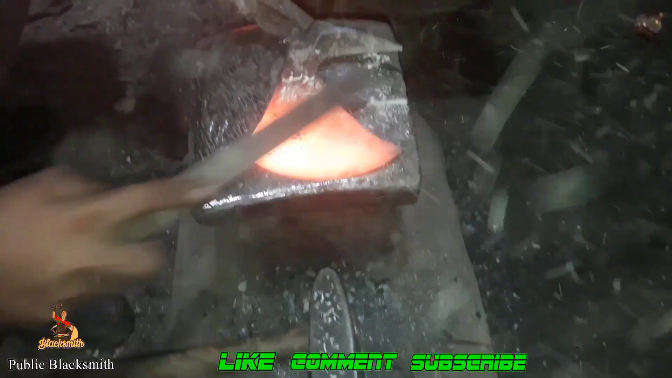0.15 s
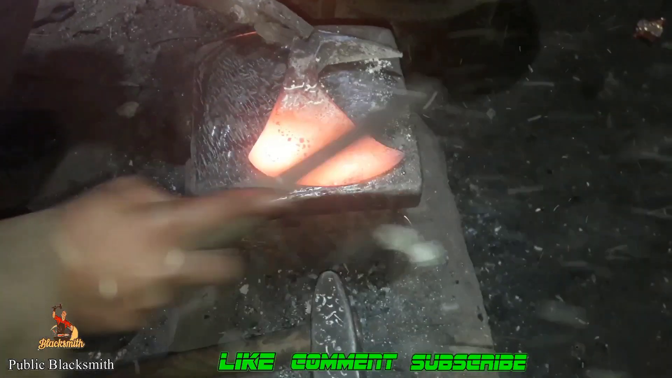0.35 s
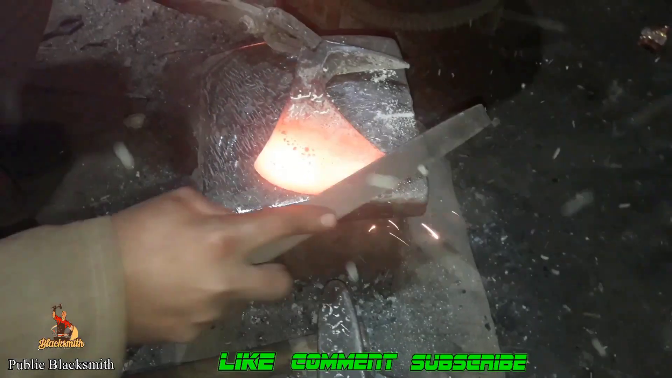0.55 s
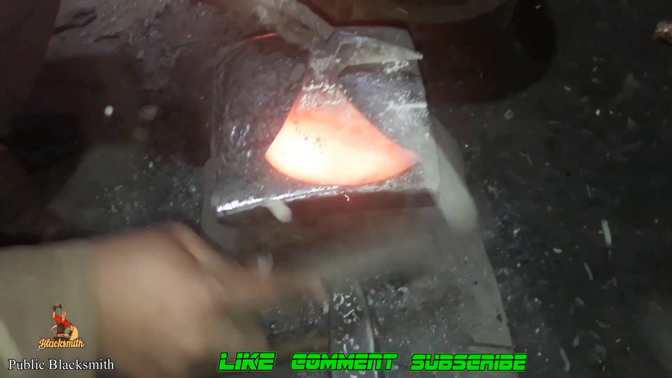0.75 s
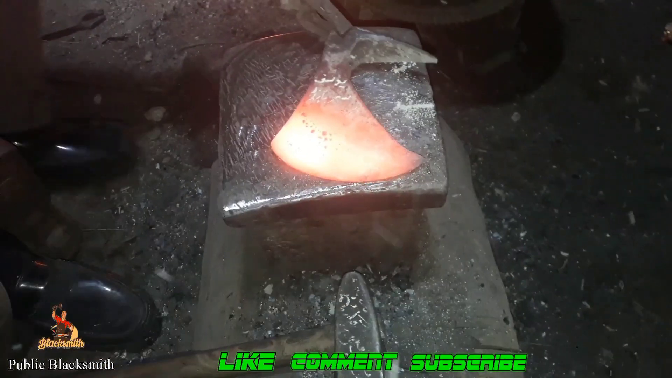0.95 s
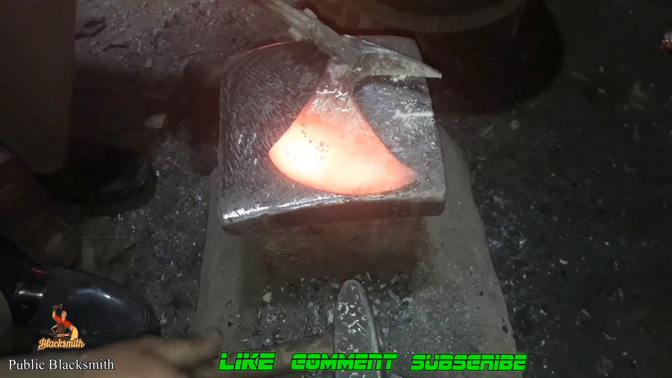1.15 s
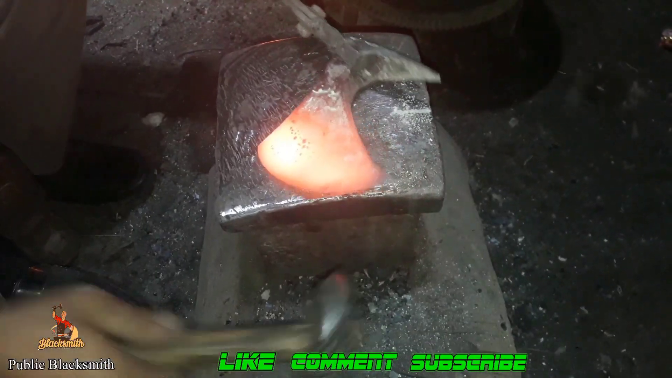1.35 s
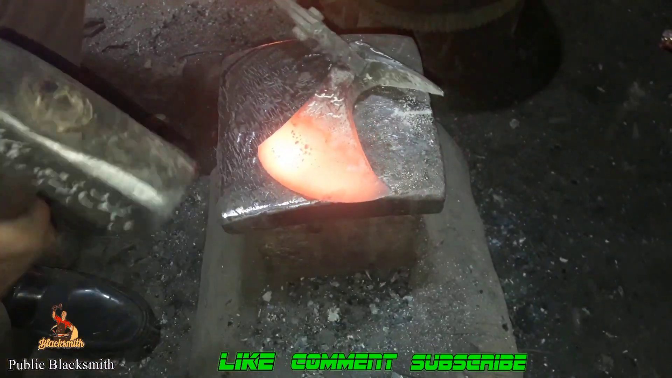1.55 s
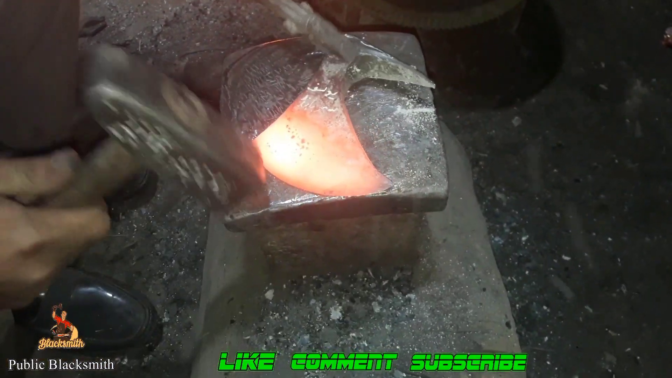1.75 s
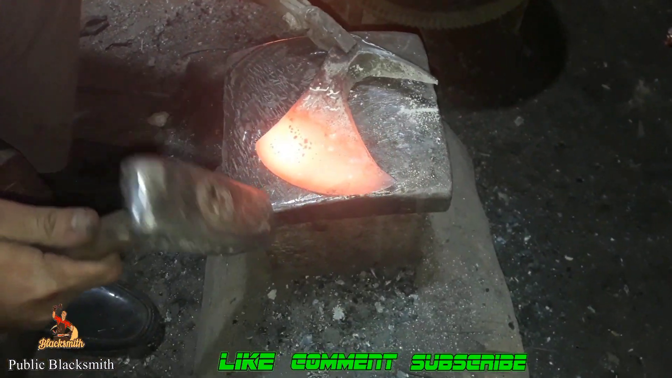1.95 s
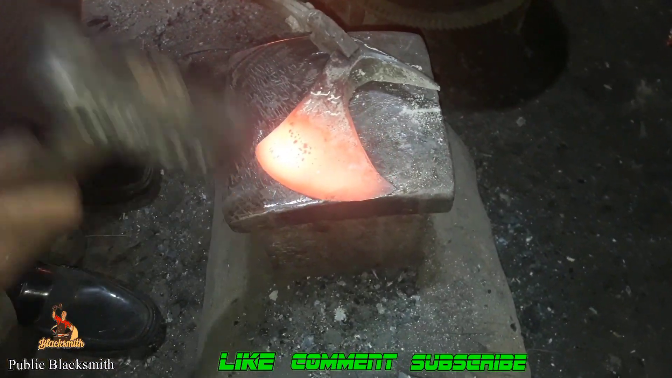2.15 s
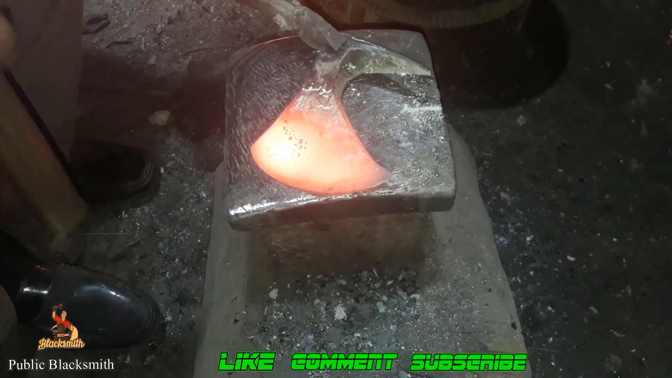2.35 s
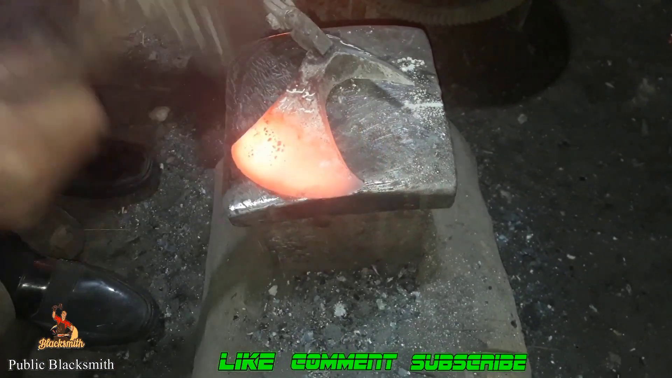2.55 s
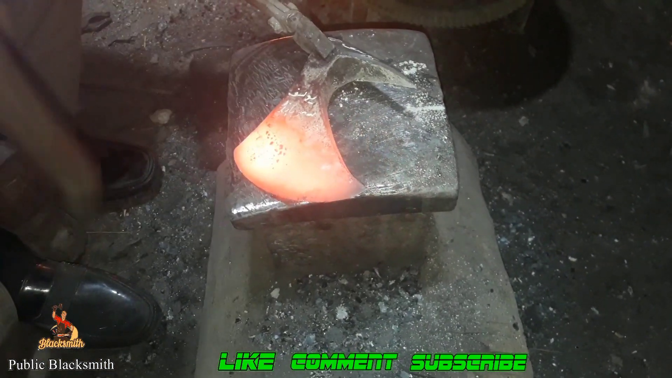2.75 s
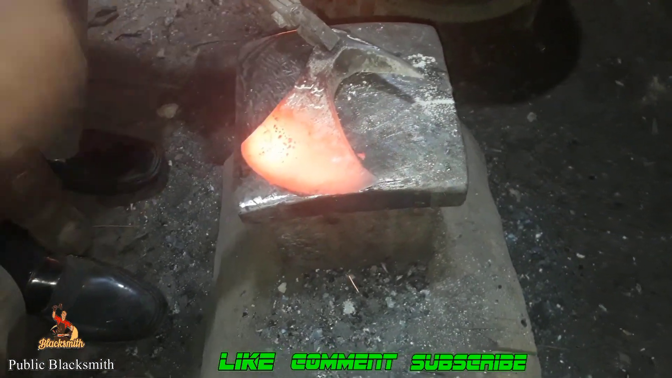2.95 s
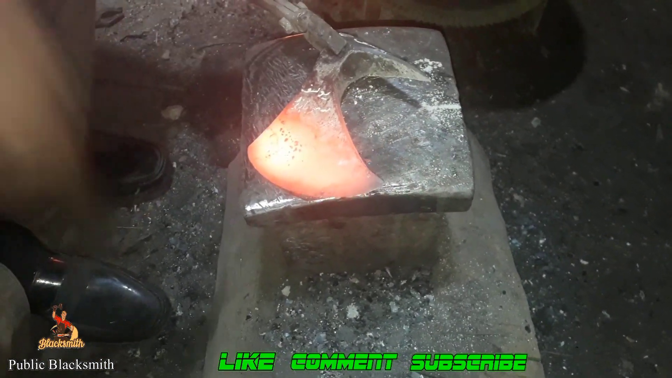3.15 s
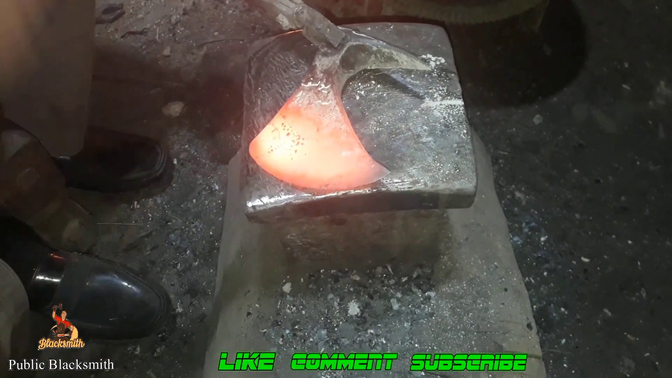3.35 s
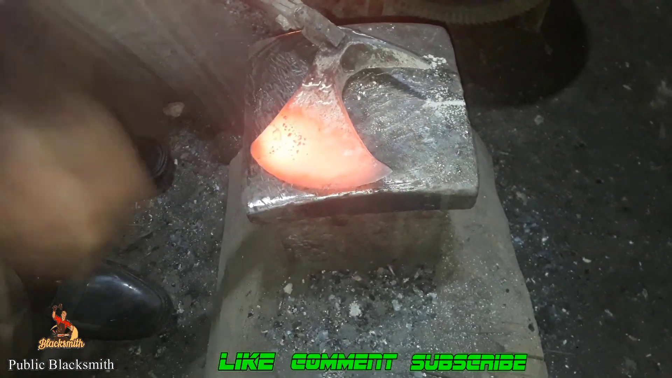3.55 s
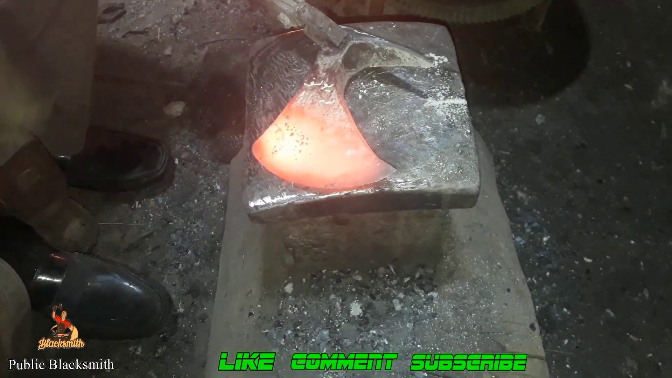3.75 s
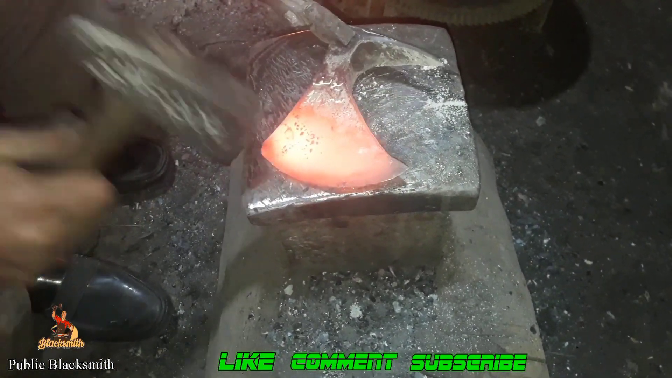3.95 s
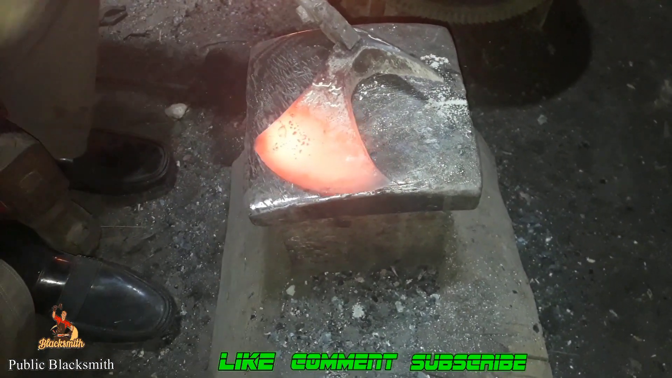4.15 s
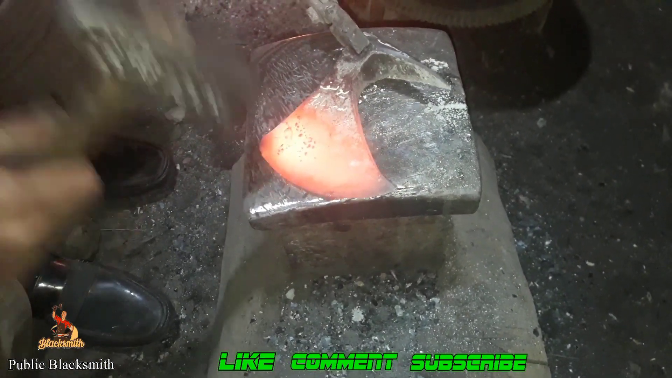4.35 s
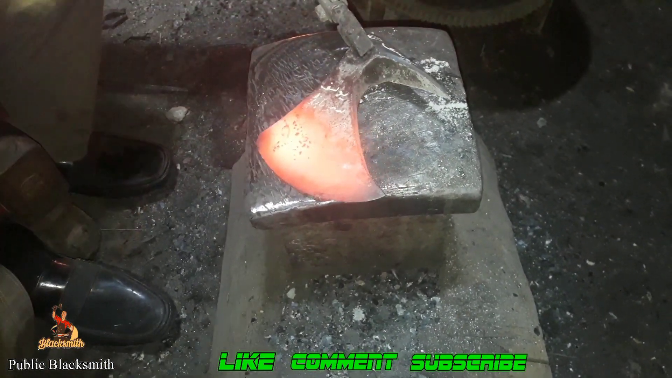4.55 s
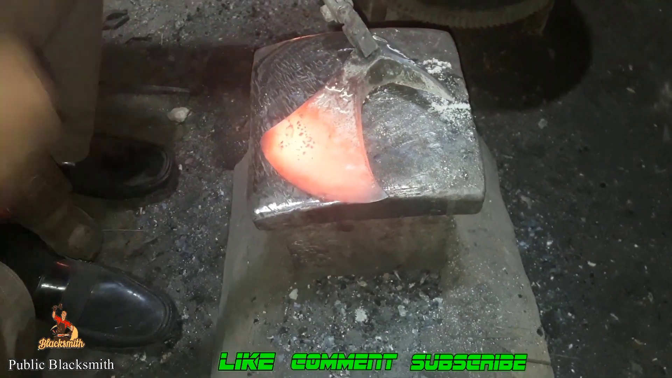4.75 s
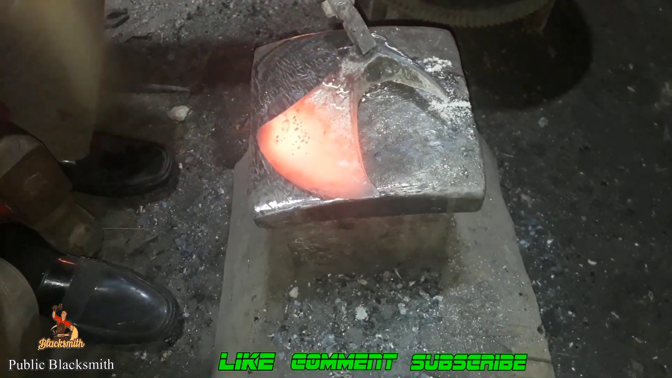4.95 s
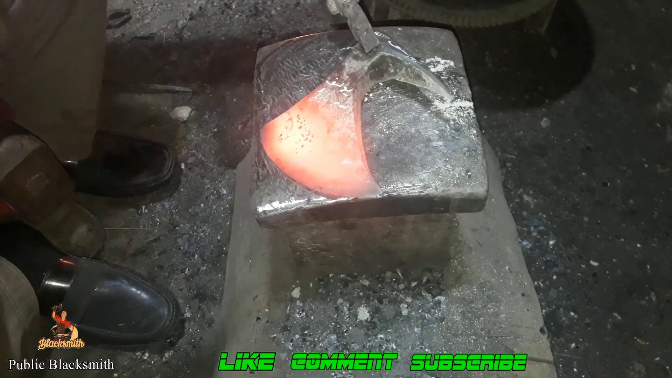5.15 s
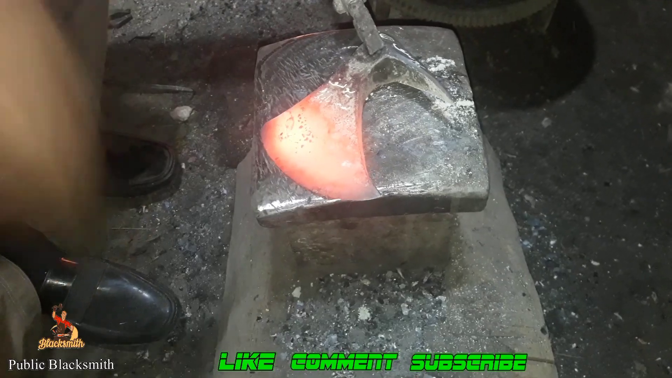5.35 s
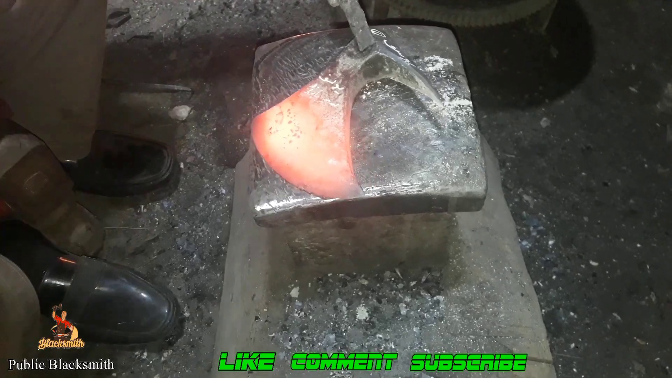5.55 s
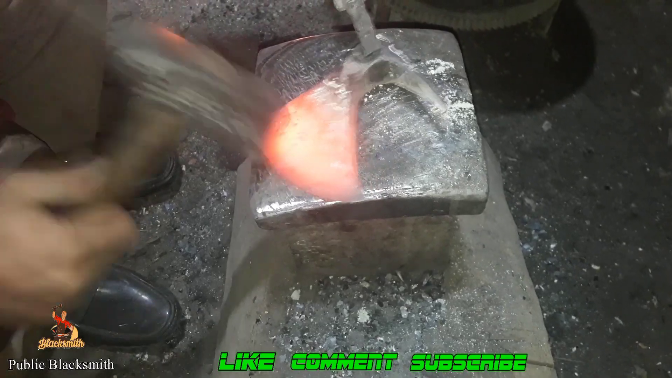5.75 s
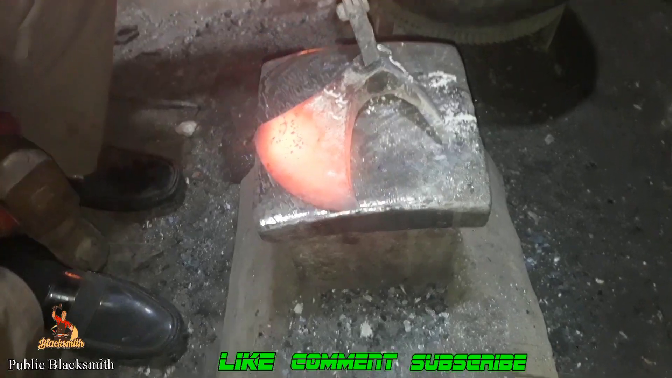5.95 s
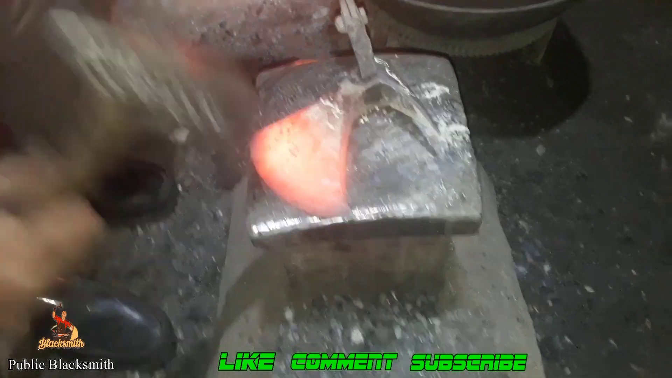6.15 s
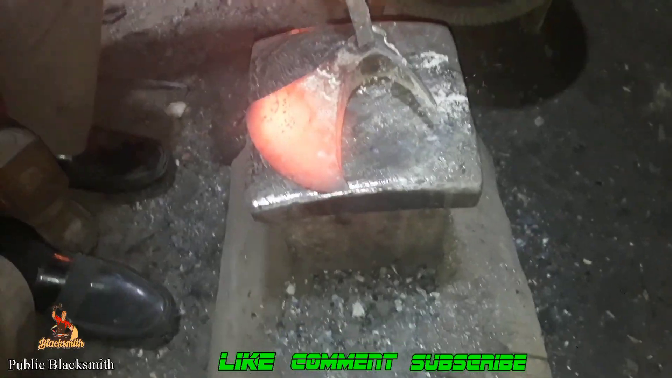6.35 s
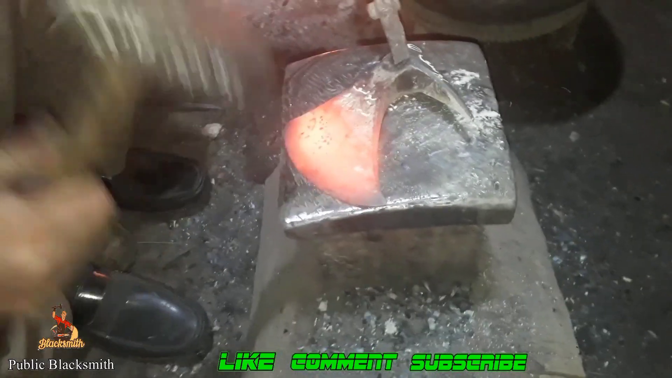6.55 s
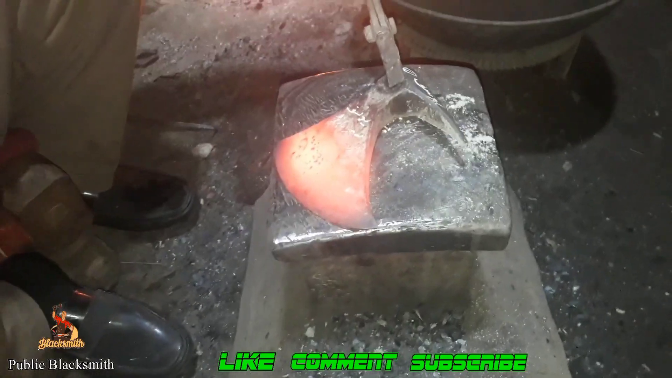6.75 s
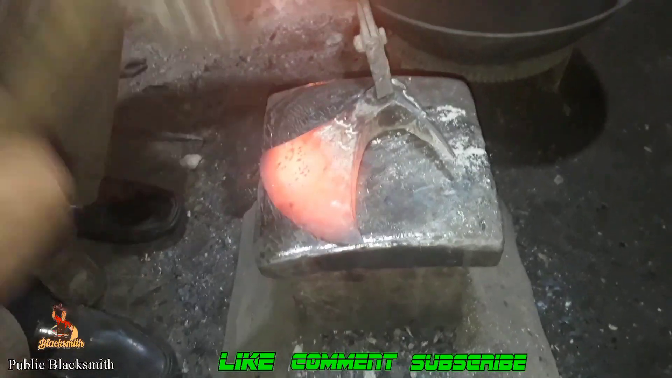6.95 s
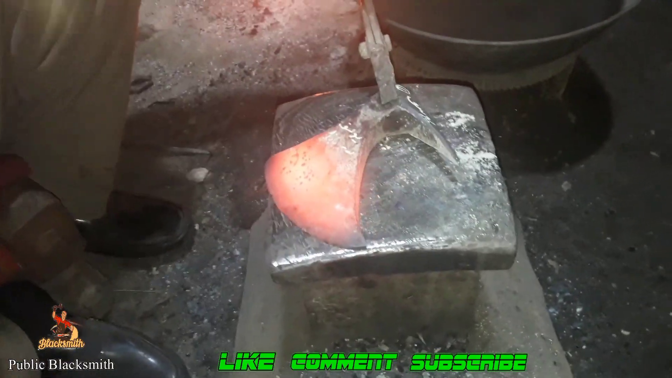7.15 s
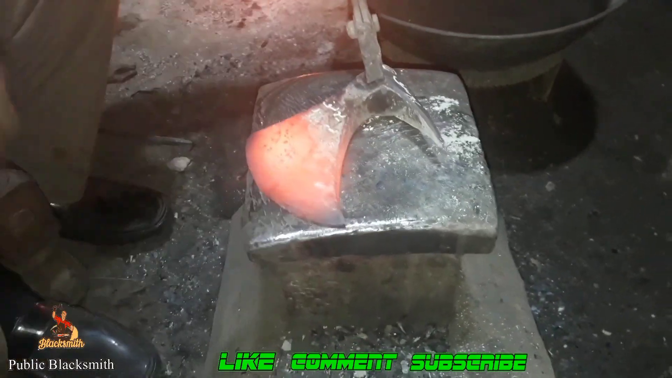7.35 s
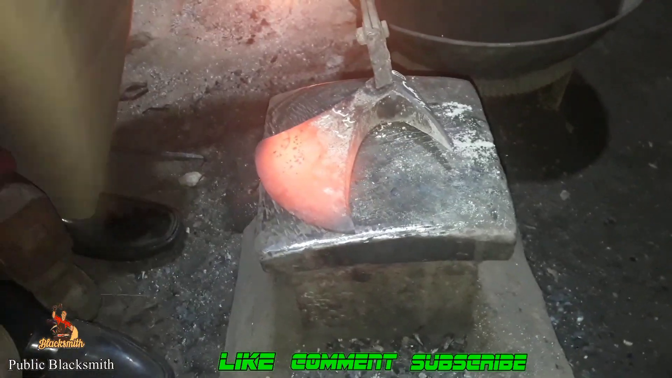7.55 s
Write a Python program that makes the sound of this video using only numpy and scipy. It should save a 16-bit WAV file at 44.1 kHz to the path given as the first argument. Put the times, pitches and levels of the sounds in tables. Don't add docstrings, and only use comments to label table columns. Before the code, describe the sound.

Quick gritty scrapes, a ringing rod drop, a bouncing hammer tap, then steady loud hammer blows on hot steel over faint fire hiss.

```python
import sys
import numpy as np
from scipy import signal
from scipy.fft import rfft, irfft
from scipy.io import wavfile
from scipy.ndimage import uniform_filter1d

SR = 44100
rng = np.random.default_rng(int(sys.argv[2]) if len(sys.argv) > 2 else 0)


def file_out(sig):
    cols = np.atleast_2d(sig).T
    lim = np.clip(cols, -1, 1)
    pcm = np.round(lim * 32767).astype(np.int16)
    wavfile.write(sys.argv[1], SR, pcm)


def ratio_of_db(decibels):
    return 10 ** (np.asarray(decibels, float) / 20)


N = 335160
T = np.arange(N) / SR


def unit(x):
    return x / np.sqrt(np.mean(x ** 2) + 1e-20)


def at_hz(points, hz):
    table_hz, value = np.transpose(points)
    return np.interp(np.log(hz), np.log(table_hz), value)


def filtered(x, order, hz, kind):
    return signal.sosfilt(signal.butter(order, hz, kind, fs=SR, output="sos"), x)


def clicks(times, sizes):
    out = np.full(N, 1e-18)
    at = np.round(np.asarray(times) * SR).astype(int)
    np.add.at(out, np.clip(at, 0, N - 1), sizes)
    return out


def ring(x, hz, t60):
    r = ratio_of_db(-60 / (t60 * SR))
    w = 2 * np.pi * hz / SR
    return signal.lfilter([0, np.sin(w)], [1, -2 * r * np.cos(w), r * r], x)


def dying(x, t60):
    return signal.lfilter([1], [1, -ratio_of_db(-60 / (t60 * SR))], x)


def coloured(x, spectrum):
    hz = np.maximum(np.fft.rfftfreq(N, 1 / SR), 1)
    return unit(irfft(rfft(x) * ratio_of_db(at_hz(spectrum, hz)), N))


def wander(rate):
    steps = rng.standard_normal(400)
    return np.interp(T * rate, np.arange(len(steps)), steps)


def grit(per_s, spread_db):
    sizes = ratio_of_db(spread_db * np.minimum(rng.exponential(1, N), 5)) * rng.choice([-1, 1], N)
    return unit(sizes * (rng.random(N) < per_s / SR))


def swell(s, hold, rise, fall):
    before = np.maximum(s - hold / 2 - T, 0)
    after = np.maximum(T - s - hold / 2, 0)
    return ratio_of_db(-rise * before - fall * after)


# t/s, peak level/dB, spread into the room/dB, anvil ring/dB, nearness to the anvil's edge/dB
BLOWS = [(1.6769, -10.5, 10, 0, -3.5), (1.804, -21.5, 11, 8.5, -19), (1.8721, -27.5, 13, -4.5, 4),
         (1.9372, -34.5, -7, -5, -2.5), (2.4841, -5.5, 9, 4.5, 4.5), (2.8589, 0.5, 1.5, 0.5, 3),
         (3.2216, -11, 15.5, 8, 7), (3.584, 0, 7, 9.5, -5.5), (3.9549, 0.5, 2.5, 1, -1),
         (4.3251, 5, -1.5, 3, -11), (4.6933, 4.5, 1.5, 10.5, -9), (5.0455, 5.5, 5.5, 7, -12.5),
         (5.4165, 4, 7, 1, 9.5), (5.7733, -12.5, 18.5, 15.5, 8.5), (6.1372, -1, 10, 13.5, -4),
         (6.5301, 2.5, 4, 10, -9), (6.8968, -3, 13, 14, -4), (7.2672, -2, 11, 13.5, -6.5)]


def hammer():
    s, peak_db, walls_db, ring_db, edge_db = np.transpose(BLOWS)
    bright_db = 0.83 * (s - 4.4) + 0.1768 * (peak_db + walls_db + 5.5) + 0.055 * edge_db
    echo_db = -14.5 + 0.65 * walls_db
    crunch = rng.standard_normal(N)
    near = thud(s, peak_db, bright_db, echo_db, crunch)
    hit = crack(s, peak_db, bright_db, echo_db, crunch)
    flutter = ratio_of_db(2.5 * wander(28))
    rung = flutter * anvil(s, peak_db, ring_db, edge_db)
    room = walls(s + 0.0015, peak_db + walls_db - 9.5, 0.26 * bright_db)
    return near + hit + rung + room + stump(s, peak_db + walls_db, crunch)


# f/Hz, level/dB, t60/s
THUD = [(249, -15.5, 0.45), (634, -23, 0.035), (954, 4, 0.012), (1278, -6, 0.027), (1530, 7, 0.0044),
        (2043, -7.5, 0.018), (2439, -0.5, 0.011), (3000, -12.5, 0.017), (3423, -13, 0.02),
        (4165, -16.5, 0.048), (4940, -14, 0.007), (6310, -23.5, 0.014)]
# delay t/s, level/dB
ECHOES = [(0.0175, 3), (0.03, -7), (.046, -14)]


def thud(s, peak_db, bright_db, echo_db, crunch):
    out = np.zeros(N)
    for k, (hz, level_db, t60) in enumerate(THUD):
        tilt_db = bright_db * np.log2(hz / 1500) - 15 * (hz < 400)
        chance_db = 3.3 * rng.standard_normal(len(s))
        size = ratio_of_db(peak_db + level_db + tilt_db + chance_db - 1.0)
        sign = (-1) ** k
        contact = 0.024 * crunch * dying(clicks(s, size), 0.042)
        out += ring(clicks(s, size * sign) + contact, hz, t60)
        for lag, lag_db in ECHOES:
            out += ring(clicks(s + lag, size * ratio_of_db(lag_db + echo_db) * sign), hz, t60 * 0.45)
    return filtered(out, 2, 170, "high")


def crack(s, peak_db, bright_db, echo_db, crunch):
    direct = dying(clicks(s, ratio_of_db(peak_db + 1.6 * bright_db - 5.5)), 0.031)
    floor_size = ratio_of_db(peak_db + echo_db + 2.5 * bright_db + 0.5)
    floor = dying(clicks(s + ECHOES[0][0], floor_size), 0.008)
    return ratio_of_db(-25.0) * signal.lfilter([1, -1], [1], crunch) * (direct + floor)


# f/Hz, level/dB, t60/s
ANVIL = [(9282, -40, 0.24), (10335, -36, 0.11), (11258, -39, 0.6), (13198, -47, .62), (5840, -34, 0.1),
         (7505, -41, 0.12), (7608, -42, 0.12), (8390, -42, .12), (9950, -31, 0.08), (12725, -48, .2),
         (14085, -45, .17), (14312, -39, .14), (14845, -33, .07), (15450, -40, .07)]
# f apart/Hz, level/dB
TWINS = [(-11, -3), (25, -4), (7, -7), (-10, -8)]
EDGE_SHARE = [0.0, 0.22, 1.0, 0]


def anvil(s, peak_db, ring_db, edge_db):
    out = np.zeros(N)
    chance = rng.standard_normal((len(s), len(ANVIL)))
    late = rng.random((len(s), 4)) / 2000
    for k, (hz, level_db, t60) in enumerate(ANVIL):
        if k < 4:
            own_db = ring_db + EDGE_SHARE[k] * edge_db
        else:
            own_db = 3 * chance[:, k]
        size = ratio_of_db(peak_db + level_db + own_db)
        out += ring(clicks(s + 0.0022, size), hz, t60)
        if k < 4:
            apart, twin_db = TWINS[k]
            twin_size = size * ratio_of_db(twin_db + 4 * chance[:, -1 - k])
            out += ring(clicks(s + 0.0025 + late[:, k], twin_size), hz + apart, t60 * 0.72)
    return out


def stump(s, level_db, crunch):
    shaken = clicks(s + 0.00097, ratio_of_db(level_db - 13))
    shape = dying(shaken, 0.18) - dying(shaken, 0.09)
    return ratio_of_db(-22.5) * ring(crunch * shape, 2377, 0.011)


# f/Hz, level/dB per Hz
WALLS = [(100, -22.5), (215, -3), (595, -6.5), (910, 3), (1310, 0), (2320, 6), (3400, -4), (6290, -9),
         (7940, -40), (10500, -30), (14000, -28), (16000, -50)]
# f/Hz, t60/s
WALL_T60 = [(100, 0.26), (500, 0.18), (1500, 0.15), (2450, 0.16), (4000, 0.16), (6500, 0.15), (9000, 0.07),
            (14000, 0.06)]


def walls(s, level_db, bright_db):
    white = coloured(rng.standard_normal(N), WALLS)
    out = np.zeros(N)
    edges = 90 * 2 ** np.arange(0, 7.6, 0.5)
    for low, high in zip(edges, edges[1:]):
        hz = np.sqrt(low * high)
        t60 = at_hz(WALL_T60, hz)
        blows = clicks(s, ratio_of_db(level_db + bright_db * np.log2(hz / 1500)))
        faint_tail = ratio_of_db(-38.5) * dying(blows, t60 * 3.7)
        shape = dying(blows, t60) - dying(blows, 0.034) + faint_tail
        out += shape * filtered(white, 2, [low, high], "band")
    return out


# t/s of firmest pressure, level/dB, bright share/dB, hold t/s
STROKES = [(0.037, -34, -1.5, .01), (0.191, -32.5, -23, 0.0042), (0.272, -47, -1.5, 0.012),
           (0.323, -37.5, -18, 0.007), (0.405, -40, -12, 0.044), (0.517, -43, -6, .008),
           (0.548, -36.5, -9, 0.0055), (0.641, -44, -6, 0.035), (0.751, -38, -3, 0.021),
           (0.33, -63.5, -10, 0.18), (0.6, -78, -15, 0.17)]
# f/Hz, level/dB per Hz
SCRAPE = [(710, -4.5), (1200, -4), (2320, -11.5), (2890, 0), (3320, -13), (4700, -16.5), (5470, -10),
          (7490, -36.5), (8910, -52.5), (10100, -36), (16000, -46)]
# f/Hz, level/dB
ROD_HELD = [(2000, 2), (2890, -6), (4000, 0), (5350, 3), (5900, -7), (6500, -8)]


def rod_scrape():
    press, bright_press = 0, 0
    for s, level_db, bright_db, hold in STROKES:
        stroke = ratio_of_db(level_db) * swell(s, hold, 793, 538)
        press = press + stroke
        bright_press = bright_press + ratio_of_db(bright_db) * stroke
    rub = grit(3800, 3.4) * ratio_of_db(3 * wander(43.65))
    rasp = coloured(rub, SCRAPE)
    bright = unit(filtered(rasp, 4, 8000, "high"))
    dull = filtered(rasp, 4, 7200, "low")
    sung = sum(ratio_of_db(level_db) * ring(rub * press, hz, 0.09) for hz, level_db in ROD_HELD)
    return dull * press + ratio_of_db(-41) * sung + bright * bright_press


# f/Hz, level/dB, t60/s
ROD = [(1239.4, 0, 1.2), (1244.4, -8, .35), (1480, -12, 0.1), (1980, -30, 0.4), (2910, -25, 0.75),
       (4020, -33, 0.5), (5362, -22, .27), (5905, -32.5, .3), (6820, -24, 0.091), (8100, -36.5, 0.19),
       (8400, -42, .15), (10100, -32.5, 0.21), (12300, -29, 0.13), (14450, -36.5, .2)]
# t/s, deep ring level/dB, high ring level/dB, click level/dB
DROPS = [
    (1.07, -39.5, -37, -26),
    (1.116, -31.5, -47.5, -23),
    (1.128, -35, -25.5, -38),
    (1.137, -24, -48.5, -30),
    (1.175, -26.5, -44.5, -28),
]


def rod_drop(gain):
    s, deep_db, high_db, click_db = np.transpose(DROPS)
    out = rng.standard_normal(N) * dying(clicks(s, ratio_of_db(click_db - 18.0)), 0.02)
    for hz, level_db, t60 in ROD:
        if hz < 1300:
            touch_db = deep_db
        else:
            touch_db = high_db + 10.5 + 3 * rng.standard_normal(len(s))
        in_step = np.round(s * hz) / hz
        out += gain * ring(clicks(in_step, ratio_of_db(level_db + touch_db)), hz, t60)
    return out


# t/s, peak level/dB, f/Hz, t60/s
TAPS = [(0.0447, -24, 3040, 0.019), (0.071, -23, 2770, 0.014), (0.181, -25.5, 5480, 0.049),
        (0.6236, -27.5, 2860, 0.048), (0.752, -29.5, 5830, 0.035), (0.8698, -40.5, 5640, 0.029),
        (1.6715, -24, 2670, 0.0047), (1.068, -42, 1463, 0.16), (1.935, -31.5, 1000, 0.069),
        (2.0923, -56, 2810, 0.026), (2.2188, -43, 5070, 0.014), (2.3743, -43, 2460, 0.0086),
        (4.928, -51, 5040, 0.02), (5.067, -16, 3630, 0.052), (6.014, -49, 4530, 0.019),
        (6.44, -60, 13700, 0.0033), (7.368, -38, 6600, 0.013)]
# level/dB, f/Hz, t60/s
SCALE_BURST = (-15, 5670, 0.096)


def taps():
    out, white = np.zeros(N), rng.standard_normal(N)
    for s, peak_db, hz, t60 in TAPS:
        burst = white * dying(clicks([s], ratio_of_db(peak_db)), t60)
        out += 0.18 * ring(burst, hz, 0.37 * t60) + 0.13 * ring(burst, hz, 4.5 / hz) + 0.079 * burst
    burst_db, hz, t60 = SCALE_BURST
    shatter = dying(clicks([BLOWS[4][0] + 0.0038], ratio_of_db(burst_db)), t60)
    return out + ring(white * shatter, hz, 12.0 / hz)


# t/s, level/dB, hold t/s
RUSTLES = [(0.86, -62, .03), (1.02, -68, .03), (1.28, -64, .07), (1.57, -67, .09), (2.1, -71, .03),
           (2.26, -72, .03), (2.42, -63, .05), (6.78, -81, .16), (7.15, -80, .16), (7.46, -79, .2)]
# f/Hz, level/dB per Hz
RUSTLE_COLOUR = [(2500, -44), (5500, 1), (7800, -29), (10500, -4), (14000, -17), (16500, -25)]


def rustles():
    level = sum(ratio_of_db(db) * swell(s, hold, 250, 400) for s, db, hold in RUSTLES)
    return level * coloured(grit(3000, 4.8), RUSTLE_COLOUR)


# t/s, peak level/dB, f/Hz
PUFFS = [(0.002, -19, 109), (0.137, -17.5, 96), (0.703, -15.5, 312), (2.487, -9, 117), (2.859, -17, 253),
         (4.694, -22, 270), (5.418, -18, 250), (5.771, -32.5, 174), (5.908, -37.5, 142), (6.013, -37, 202),
         (6.898, -27, 245), (3.222, -37, 70), (7.268, -25, 60.3)]


def puffs():
    out = np.zeros(N)
    for s, peak_db, hz in PUFFS:
        push = uniform_filter1d(clicks([s], ratio_of_db(peak_db + 13.5)), size=24)
        out -= ring(push, hz, 1.9 / hz)
    return out


# f/Hz, level/dB per Hz
HISS = [(120, -42), (200, -17), (316, -15.5), (387, -11), (440, -12.5), (968, -13), (1140, -13.5),
        (1250, -13), (1350, -17), (2960, -19.5), (4520, -27), (5520, -21), (8270, -47), (12200, -52.5),
        (16000, -60.5)]
# f/Hz, width/Hz, level over hiss/dB
BLOWER = [
    (382.3, 7, -5),
    (1150, 63, -13.5),
]
# f/Hz, level/dB per Hz
RUMBLE = [(12, -43.5), (20, -47.5), (43, -14.5), (119, 2.5), (198, -3.5), (315, -9.5), (376, 2),
          (400, -21.5), (520, -36), (880, -120)]


def fire():
    hiss = coloured(rng.standard_normal(N), HISS) * ratio_of_db(1.0 * wander(9))
    top = unit(filtered(hiss, 2, 2700, "high"))
    body = filtered(hiss, 2, 2700, "low")
    for hz, width, level_db in BLOWER:
        body += ratio_of_db(level_db) * unit(ring(rng.standard_normal(N), hz, 3.3 / width))
    air = unit(filtered(hiss, 3, [9000, 15500], "band"))
    rumble = coloured(rng.standard_normal(N), RUMBLE) * ratio_of_db(1.5 * wander(1.6))
    return ratio_of_db(-38) * body - ratio_of_db(-64.5) * top + ratio_of_db(-39) * rumble + ratio_of_db(-64.5) * air


# t/s, level/dB
GAIN = [(0.0, -1.5), (0.15, -6.5), (1.1, -5), (1.6, -7.5), (1.8, -12.5), (2.06, -18.5), (2.42, -9),
        (2.58, -21), (3.75, -22.5), (5.3, -22.5), (5.8, -22.5), (6.0, -19), (6.4, -20.5), (7.6, -20)]


def scene():
    ducked = np.where(T > BLOWS[0][0], ratio_of_db(-13.5), 1)
    gain_db = np.interp(T, *np.transpose(GAIN))
    settled_db = -17
    forging = ratio_of_db(gain_db - settled_db) * hammer()
    rod = rod_scrape() + rod_drop(ducked)
    small_things = taps() + rustles() + puffs()
    return (forging + rod + small_things + ratio_of_db(gain_db) * fire())[None]


def roll_off(x):
    return signal.sosfilt(signal.butter(12, 17110, fs=SR, output="sos"), x)


def record(dry):
    limit_db, attack_s, late_s = -4.5, 0.0018, 0.004
    release_db = 397.5 * T
    over_db = np.maximum(20 * np.log10(np.abs(dry) + 1e-9) - limit_db, 0)
    held_db = np.maximum.accumulate(over_db + release_db, axis=1) - release_db
    held_db = np.roll(held_db, int(late_s * SR), axis=1)
    lag = np.exp(-1 / (attack_s * SR))
    closing_db = signal.lfilter([(1 - lag) ** 2], [1, -2 * lag, lag * lag], held_db)
    passed = filtered(1.367 * dry * ratio_of_db(-closing_db), 2, 55, "high")
    top = 0.9
    heard = top * np.tanh(passed / top)
    heard = signal.sosfilt(signal.cheby2(12, 50, 16950, fs=SR, output="sos"), heard)
    return roll_off(heard)


dry = scene()
out = record(dry)
file_out(out)
```